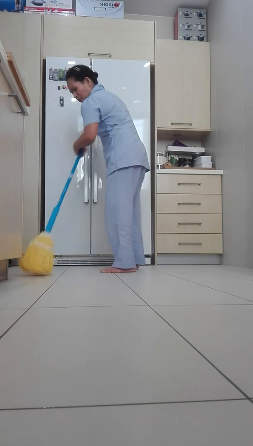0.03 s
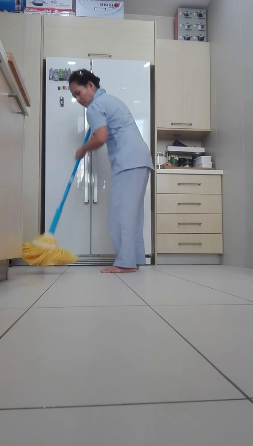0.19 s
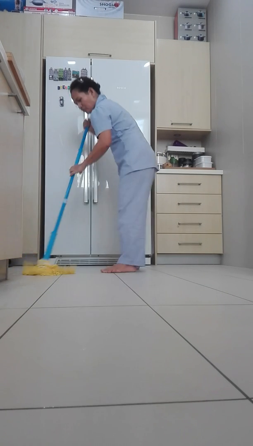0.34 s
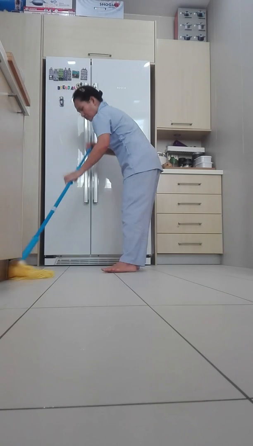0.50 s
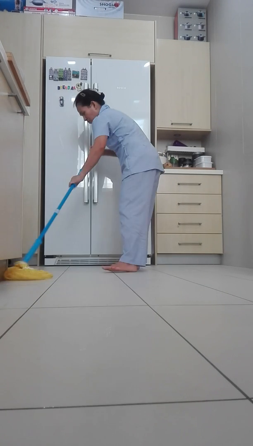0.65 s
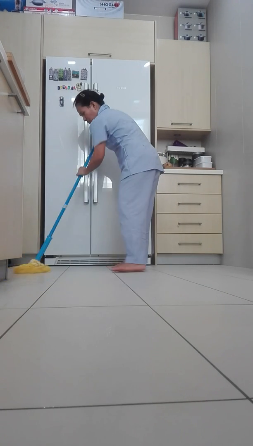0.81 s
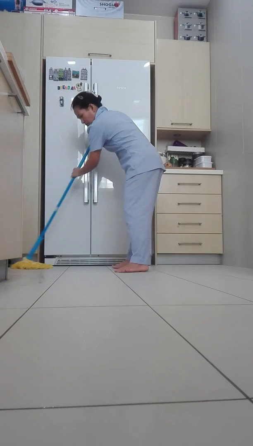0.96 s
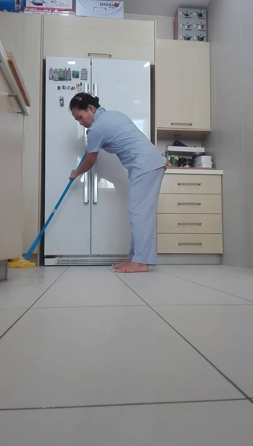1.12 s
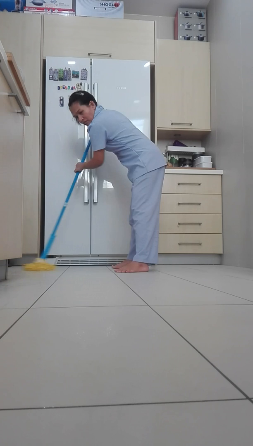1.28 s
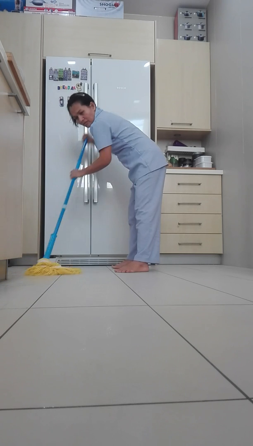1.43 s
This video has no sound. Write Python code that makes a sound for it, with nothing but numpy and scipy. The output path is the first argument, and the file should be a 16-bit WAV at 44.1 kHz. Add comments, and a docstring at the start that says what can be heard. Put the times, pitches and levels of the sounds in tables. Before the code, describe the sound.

A wet string mop drops onto kitchen tiles at about 0.4 seconds, with a soft thud and a plastic clack that rings briefly in the handle and hard room. At 0.6 seconds a louder, hollow knock reaches the microphone through the floor. The strings swish and scuff quietly, then the mop taps again with two light thuds near 1.4 seconds. A faint, low appliance hum runs throughout.

```python
"""A string mop is dropped on a tiled kitchen floor. Over a low room hum, its strings swish on the tiles.
At 0.36 s the wet head thuds and the plastic socket clacks, ringing the handle and the hard room.
At 0.59 s a knock runs through the floor to the microphone standing on it, treble first, bass after.
The head scuffs softly, and near 1.4 s the socket taps again with two light thuds."""
import sys
import numpy as np
from scipy import signal
from scipy.fft import rfft, irfft
from scipy.io import wavfile

SR = 44100
rng = np.random.default_rng(int(sys.argv[2]) if len(sys.argv) > 2 else 0)


def dump(signal):
    """Clip the signal to [-1, 1] and save it as 16-bit WAV at the path in sys.argv[1]."""
    limited = np.clip(np.atleast_2d(signal).T, -1, 1)
    pcm = np.round(limited * 32767).astype(np.int16)
    wavfile.write(sys.argv[1], SR, pcm)


N = 63945
T = np.arange(N) / SR
BIN_HZ = np.fft.rfftfreq(N, 1 / SR)


def amp(db):
    """Decibels to gain."""
    return 10 ** (np.asarray(db) / 20)


def unit_rms(x):
    """Scales to rms 1."""
    return x / np.sqrt(np.mean(abs(x) ** 2) + 1e-20)


def burst(x):
    """Scales to the energy of 10 ms at full level."""
    return x / np.linalg.norm(x) * np.sqrt(SR * .01)


def at_hz(points, hz):
    """Interpolates a table over log frequency."""
    f, value = np.transpose(points)
    return np.interp(np.log(hz + 1), np.log(f + 1), value)


def envelope(points):
    """Gain over time from a dB curve."""
    return amp(np.interp(T, *np.transpose(points)))


def add(mix, start_s, sound):
    """Mixes a sound in at start_s."""
    part = mix[round(start_s * SR):][:len(sound)]
    part += sound[:len(part)]


def coloured(x, spectrum, size=4096):
    """Minimum-phase filter with the given spectrum."""
    log_gain = np.log(amp(at_hz(spectrum, abs(np.fft.fftfreq(size, 1 / SR)))))
    response = np.exp(np.conj(signal.hilbert(log_gain)))
    impulse = np.fft.ifft(response).real[:size // 2]
    return signal.fftconvolve(x, impulse)[:len(x)]


def steady(x, spectrum):
    """Colours a continuous sound, rms 1."""
    return unit_rms(irfft(rfft(x) * amp(at_hz(spectrum, BIN_HZ)), N))


def ring(modes, rise_s=1 / SR):
    """Decaying modes of a struck body, swelling over the contact time."""
    tones = sum(amp(db - 60 * T / t60_s) * np.sin(2 * np.pi * hz * T) for hz, db, t60_s in modes)
    return burst(tones * np.minimum(T / rise_s, 1))


# appliance hum: f/Hz, level/dB
HUM_TONES = [(123.8, -52.5), (193.8, -56.5), (226.1, -66), (349.9, -70.5)]
# hum fade: t/s, gain/dB
HUM_FADE = [(0, 6), (.25, 5), (.75, 2), (1.1, -1), (1.45, -1.5)]
# faint whine: f/Hz, level/dB
WHINE_TONES = [(1879, -74.5), (1981, -73.5)]
# room rumble and hiss: f/Hz, gain/dB
HISS_SPECTRUM = [(15, -21), (25, -11), (60, -9.5), (100, -14), (145, -3), (195, -10), (260, -13),
                 (400, -20.5), (520, -28.5), (850, -27.5), (1400, -32.5), (2000, -36.5), (3000, -41.5),
                 (7000, -44.5), (15500, -48.5)]

def hum(waver_depth=.37, waver_hz=6.6, hiss_db=-50):
    """Wavering appliance tones and a steady whine over the room's rumble and hiss."""
    slow_band = np.exp(-(np.fft.fftfreq(N, 1 / SR) / waver_hz) ** 2)
    tones = np.zeros(N)
    for hz, db in HUM_TONES:
        noise = rng.standard_normal(N) + 1j * rng.standard_normal(N)
        waver = 1 + waver_depth * unit_rms(np.fft.ifft(slow_band * noise))
        carrier = np.exp(2j * np.pi * (hz * T + rng.random()))
        tones += amp(db) * np.sqrt(2) * (waver * carrier).real
    whine = sum(amp(db) * np.sqrt(2) * np.sin(2 * np.pi * hz * T) for hz, db in WHINE_TONES)
    hiss = amp(hiss_db) * steady(rng.standard_normal(N), HISS_SPECTRUM)
    return tones * envelope(HUM_FADE) + whine + hiss


# strings moving over tile: t/s, level/dB
SWISH_LEVEL = [(0, -55), (.07, -60.5), (.22, -61.5), (.3, -55), (.35, -52.5), (.47, -69), (.54, -50),
               (.58, -48), (.68, -60.5), (.77, -58), (.88, -60), (.95, -57.5), (1.03, -51.5), (1.09, -54),
               (1.16, -57.5), (1.3, -58), (1.325, -57), (1.36, -57), (1.45, -50)]
# string friction: f/Hz, gain/dB
SWISH_SPECTRUM = [(150, 4), (380, 4), (850, 0.5), (1200, 0), (1800, -2.5), (2600, -5.5), (3300, -8),
                  (5200, -8.5), (7500, -12.5), (10000, -11), (15500, -16)]

def strings(ticks_per_s=1500, spread_db=4.5, tick_gain=.43):
    """Wet strings rub the tiles: a soft hiss with tiny fibre ticks."""
    sizes = amp(spread_db * np.minimum(rng.exponential(1, N), 5))
    ticks = sizes * (rng.random(N) < ticks_per_s / SR) * rng.choice([-1, 1], N)
    rub = tick_gain * unit_rms(ticks) + rng.standard_normal(N)
    return envelope(SWISH_LEVEL) * steady(rub, SWISH_SPECTRUM)


# soft weight landing: t/s, peak/dB, f/Hz, rise/s, t60/s
THUDS = [(0.3567, -26.5, 131, 0.0084, 0.093), (0.363, -35.5, 89.4, 0.0095, 0.28),
         (0.5962, -17.5, 138.5, 0.0026, 0.139), (0.627, -21.5, 135, 0.0157, 0.046),
         (1.371, -39, 143, 0.0022, 0.11), (1.434, -40, 189, .006, .12)]

def thuds():
    """Soft blows swing the floor for a few low cycles."""
    out = np.zeros(N)
    for start_s, db, hz, rise_s, t60_s in THUDS:
        attack = np.minimum(T / rise_s, 1)
        decay = amp(db - 60 * np.maximum(T - rise_s, 0) / t60_s)
        add(out, start_s, attack * decay * np.sin(2 * np.pi * hz * T))
    return out


# socket hits: t/s, level/dB, click/dB, handle/dB, body/dB, treble/dB
CLACKS = [(0.3625, -37.5, -14, -9, 1.5, -0.5), (0.38, -28, -4.5, -6.5, 0.5, 0.5),
          (0.393, -31.5, -24, -13, 0, 0), (0.525, -57, -2, -22, -8, 3), (0.541, -57.5, -3, -20, -5, 4.5),
          (1.3766, -42.5, -3, -3.5, -9.5, -4), (1.3856, -47.5, -8, -12, -5.5, 4),
          (1.4455, -52, -7, -12, -6, 2)]
# contact click: f/Hz, level/dB, t60/s
CLICK_MODES = [(740, 4, 0.0083), (1276, -3.5, 0.028), (1940, -3, 0.022), (4570, 3.5, 0.0042),
               (8740, -2.5, 0.007), (12000, 4.5, 0.0047)]
# socket and handle ring: f/Hz, level/dB, t60/s
HANDLE_MODES = [(460, 1.5, 0.22), (571, -8, 0.14), (668, -2, 0.26), (784, -12, .22), (860, 1, 0.29),
                (903, 6.5, 0.17), (993, 3, 0.13), (1338, 0, .25), (1661, -2, 0.73), (1870, -14, .25),
                (2012, 3.5, 0.27), (2180, -7, .25), (2450, -4, 0.41), (2650, -5, 0.67), (4837, -8, 0.47),
                (5440, -8, .3), (9500, -15, .3)]
# clack reverb: f/Hz, gain/dB
CLACK_ROOM_SPECTRUM = [(100, -5), (230, 3), (330, -0.5), (520, 4), (900, 2.5), (1150, -1.5), (1900, 1),
                       (2650, 2.5), (3100, -10.5), (3700, -10), (5200, -2.5), (6300, -9.5), (7500, -8),
                       (9600, -5), (12500, -7.5), (15500, -12)]

def socket(contact_s=.00018, body_hz=1010, treble_hz=2920):
    """Plastic hits tile: a hard click, the ringing handle and the room's answer."""
    out = np.zeros(N)
    click, handle = ring(CLICK_MODES, contact_s), ring(HANDLE_MODES)
    for start_s, db, click_db, handle_db, body_db, treble_db in CLACKS:
        clack = amp(click_db) * click + amp(handle_db) * handle + room(CLACK_ROOM_SPECTRUM)
        low_shelf = [(body_hz * .75, body_db), (body_hz * 1.2, 0)]
        high_shelf = [(treble_hz * .75, 0), (treble_hz * 1.2, treble_db)]
        add(out, start_s, amp(db) * coloured(clack, low_shelf + high_shelf))
    return out


# kitchen reverb decay: f/Hz, t60/s
ROOM_T60 = [(100, 0.59), (500, 0.34), (1500, 0.44), (4000, 0.48), (10000, 0.41), (15000, 0.35)]

def room(spectrum, early_db=4, early_t60_s=.15, first_echo_s=.0015):
    """A hit reflects off tiles and cupboards: a quick early cluster and a longer tail."""
    taps = rng.choice([-1., 1.], N) * (rng.random(N) < .5)
    hz, t, frames = signal.stft(taps, SR, nperseg=256)
    decay = amp(-60 * t / at_hz(ROOM_T60, hz)[:, None])
    tail = signal.istft(frames * decay, SR, nperseg=256)[1][:N]
    early = rng.standard_normal(N) * amp(early_db - 60 * T / early_t60_s) / np.sqrt(2)
    reflections = (tail + early) * (T > first_echo_s)
    return burst(coloured(reflections, spectrum))


# hollow strike: f/Hz, level/dB, t60/s
STRIKE_MODES = [(353, 0.5, 0.054), (1272, 1.5, 0.017), (1744, -3.5, 0.017), (2330, 0, 0.017),
                (2790, -1, .016), (3680, -1, .016), (4145, -1, 0.014), (5800, -5, 0.014),
                (7000, -10, 0.015)]
# short and long floor path: delay at 1 kHz/s, level/dB
FLOOR_PATHS = [(.0034, -30.5), (.0125, -43.5)]
# bending wave: f/Hz, gain/dB
WAVE_SPECTRUM = [(40, -12), (100, 5.5), (330, 8), (800, -6), (1250, -12), (2000, -19), (3800, -8),
                 (6000, -14.5), (9000, -27.5), (15500, -38)]
# floor ring: f/Hz, level/dB, t60/s
FLOOR_MODES = [(322.6, -6.5, .35), (464.6, 0, 0.2), (646, -16, 0.1)]
# knock reverb: f/Hz, gain/dB
KNOCK_ROOM_SPECTRUM = [(60, 6.5), (200, 5.5), (500, 5), (900, -3.5), (1900, -9), (2600, -14), (3600, -9),
                       (4400, -16), (5600, -14.5), (7000, -22), (11000, -29), (15500, -34)]

def knock(start_s=.5903, strike_s=.5906, contact_s=.0018, fizz_hz=7400, fizz_t60_s=.071, echo_s=.019):
    """A hollow strike with a bright fizz; higher bending waves arrive first, floor and room ring on."""
    out = np.zeros(N)
    add(out, strike_s, amp(-30) * ring(STRIKE_MODES, contact_s))
    for delay_s, db in FLOOR_PATHS:
        lag_cycles = 2 * delay_s * np.sqrt(1000 * BIN_HZ)  # speed grows as sqrt(f)
        wave = irfft(amp(at_hz(WAVE_SPECTRUM, BIN_HZ)) * np.exp(-2j * np.pi * lag_cycles), N)
        add(out, start_s, amp(db) * burst(wave))
    arrival_s = start_s + FLOOR_PATHS[0][0]
    add(out, arrival_s, amp(-37) * ring(FLOOR_MODES))
    fizz_band = signal.butter(1, [fizz_hz / np.sqrt(2), fizz_hz * np.sqrt(2)], "band", fs=SR)
    fizz = signal.lfilter(*fizz_band, rng.standard_normal(N)) * amp(-60 * T / fizz_t60_s)
    add(out, strike_s + contact_s, amp(-47) * burst(fizz))
    for delay_s, db in [(0, -32), (echo_s, -35.5)]:
        add(out, start_s + delay_s, amp(db) * room(KNOCK_ROOM_SPECTRUM))
    return out


# mop head scuffs: t/s, level/dB, f/Hz, length/s
SCUFFS = [(1.046, -60, 570, 0.051), (1.331, -55, 640, .025), (0.755, -56.5, 570, 0.031)]

def scuffs(width_oct=.81):
    """The head drags briefly: a dull puff of friction."""
    out = np.zeros(N)
    for peak_s, db, hz, length_s in SCUFFS:
        band = np.exp(-(np.log2((BIN_HZ + 1) / hz) / width_oct) ** 2)
        friction = unit_rms(irfft(rfft(rng.standard_normal(N)) * band, N))
        swell = np.exp(-2 * ((T - peak_s) / length_s) ** 2)
        out += amp(db) * swell * friction
    return out


def scene():
    """Room, mop and floor in mono."""
    return (hum() + strings() + thuds() + socket() + knock() + scuffs())[None]


def record(dry):
    """Steep low-pass at 15.75 kHz."""
    lowpass = signal.firwin(511, 15750, window=("kaiser", 9), fs=SR)
    return signal.oaconvolve(dry, lowpass[None], "same")


dry = scene()
out = record(dry)
dump(out)
```